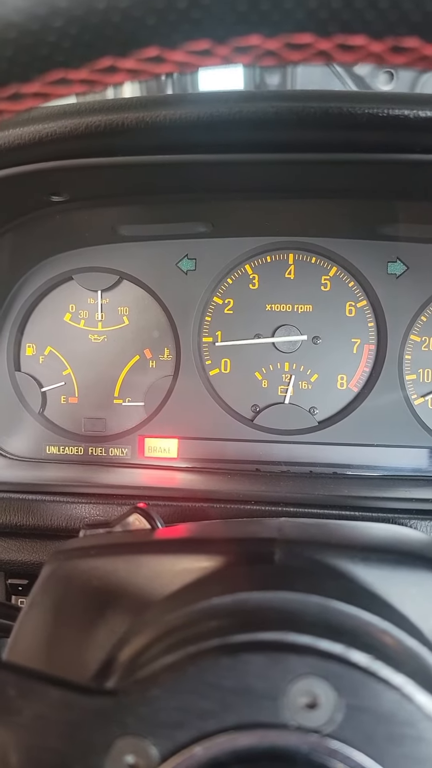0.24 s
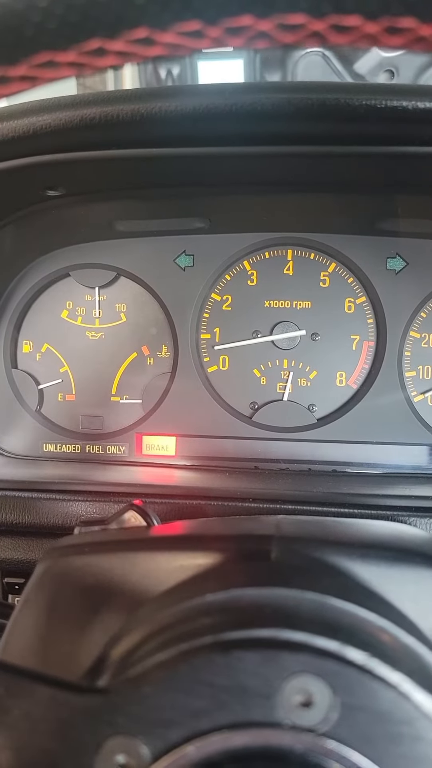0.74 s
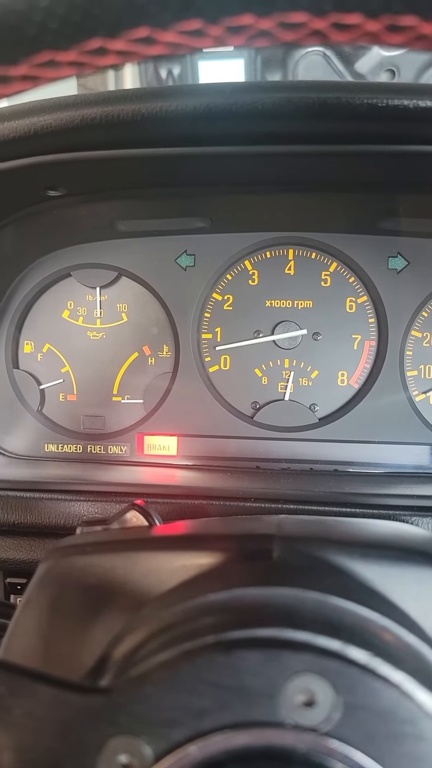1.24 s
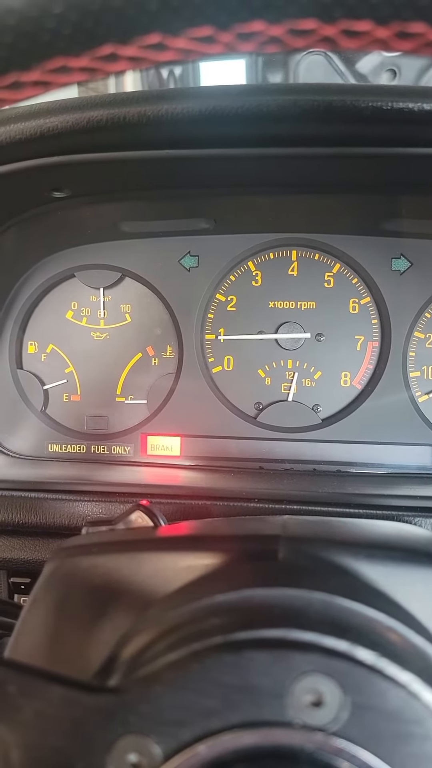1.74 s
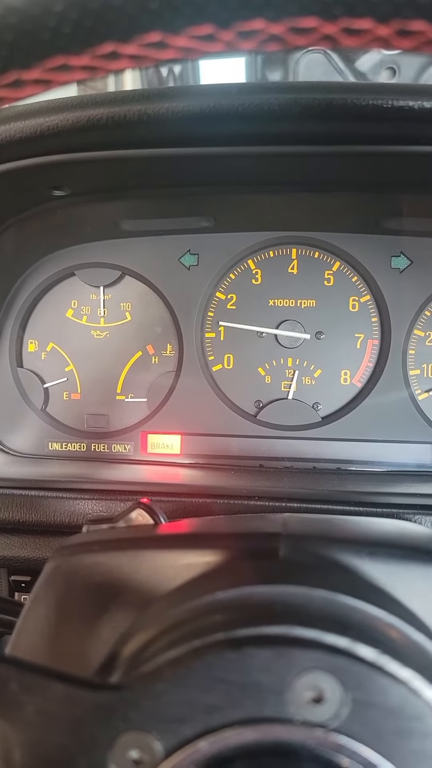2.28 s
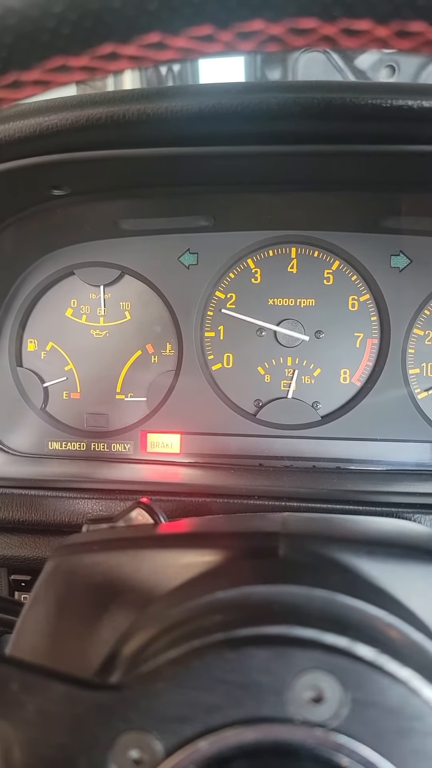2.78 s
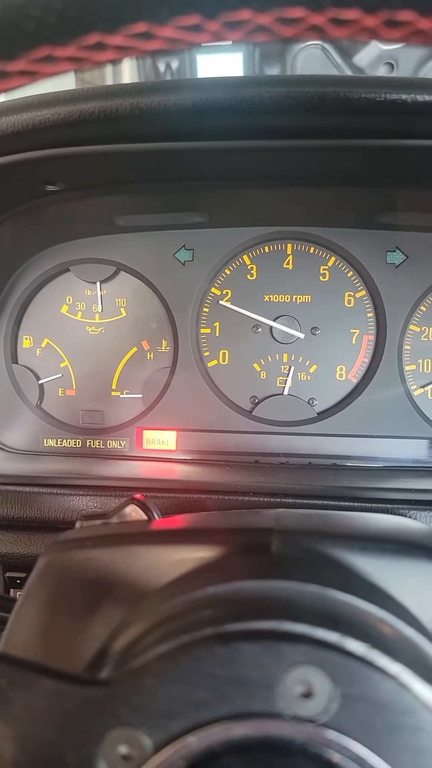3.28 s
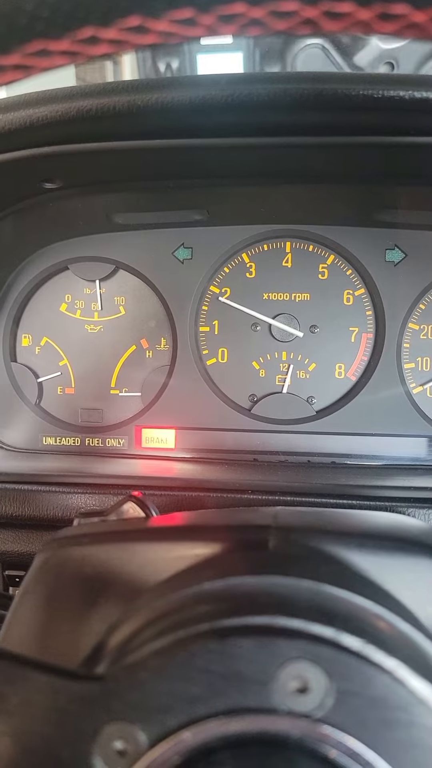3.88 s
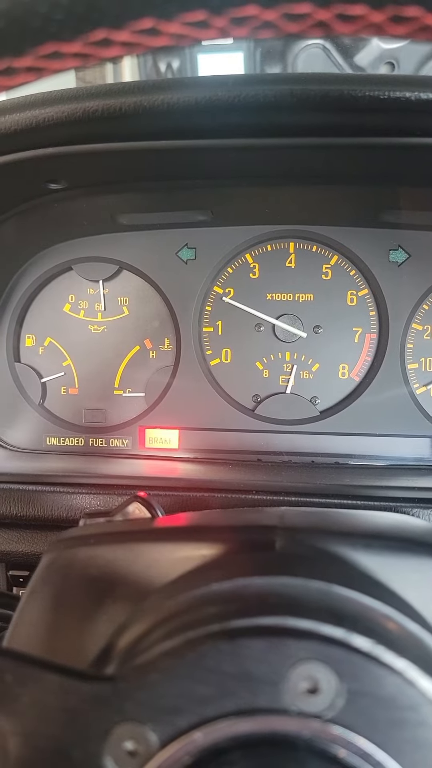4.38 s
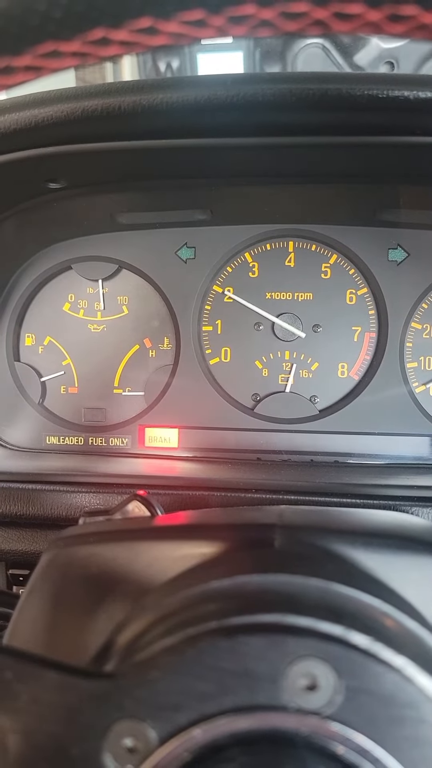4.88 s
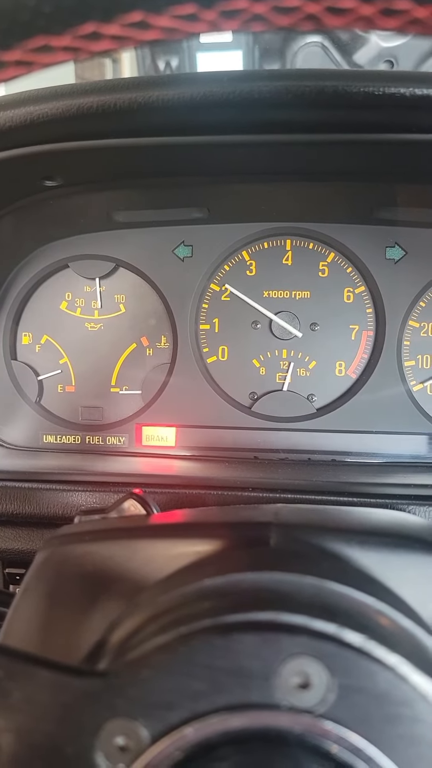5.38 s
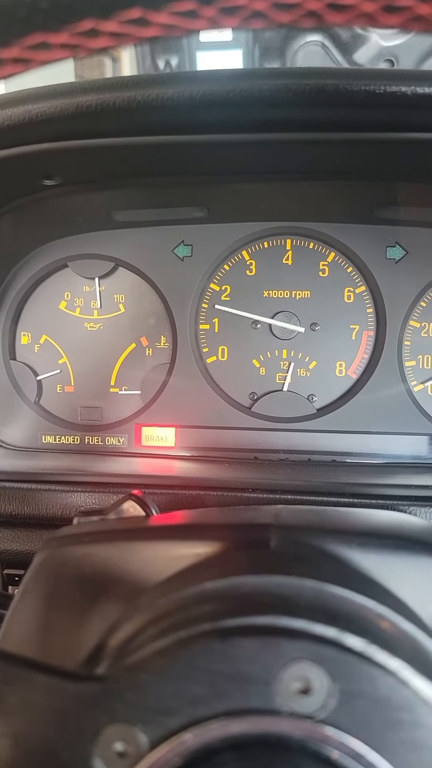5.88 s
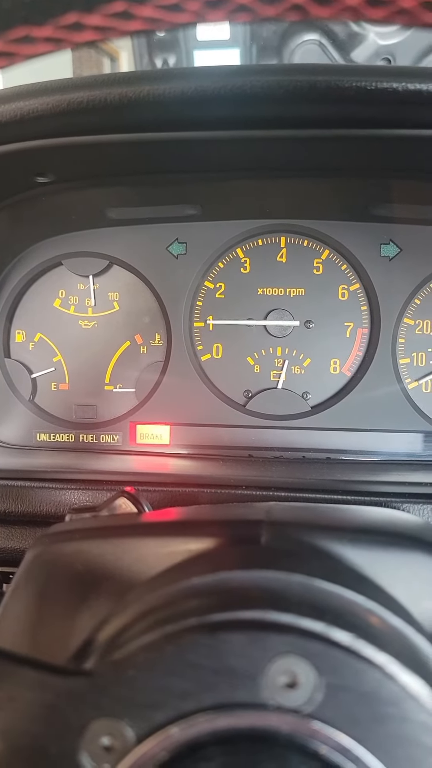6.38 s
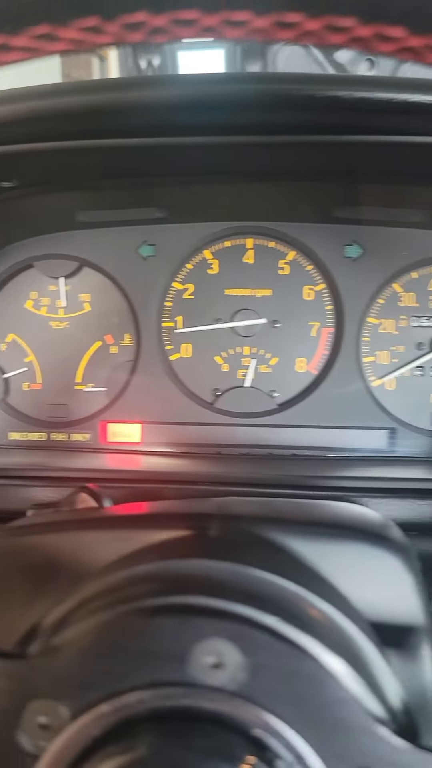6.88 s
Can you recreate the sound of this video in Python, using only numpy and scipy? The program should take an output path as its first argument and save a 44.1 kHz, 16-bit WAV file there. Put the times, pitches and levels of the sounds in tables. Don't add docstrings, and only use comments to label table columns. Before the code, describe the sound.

Inside a car, a rotary engine sags to a lumpy idle, revs up and holds, climbs briefly higher, then falls back to idle.

```python
import sys
import numpy as np
from scipy import signal
from scipy.fft import rfft, irfft, next_fast_len
from scipy.io import wavfile
from scipy.ndimage import uniform_filter1d

SR = 44100
rng = np.random.default_rng(int(sys.argv[2]) if len(sys.argv) > 2 else 0)


def gain_from_db(level_db):
    decades = np.asarray(level_db, float) / 20
    return 10 ** decades


def unload_audio(sound):
    columns = np.transpose(np.atleast_2d(sound))
    steps = np.round(np.clip(columns, -1, 1) * 32767)
    wavfile.write(sys.argv[1], SR, steps.astype(np.int16))


N = 314433
TIME = np.arange(N) / SR

# start_s, opening (0-1)
THROTTLE = [
    (0, 0.54),
    (.4, 0.17),
    (1.4, 0.13),
    (1.9, 0),
    (2.7, 1),
    (5.31, 0.96),
    (5.45, 0.55),
    (6.2, 0.04),
    (7.13, 0.03),
]


def curves(table):
    s, *columns = np.transpose(table)
    return [np.interp(TIME, s, column) for column in columns]


def unit(x):
    return x / np.sqrt(np.mean(x ** 2))


def ring(x, hz, width):
    return signal.lfilter(*signal.iirpeak(hz, hz / width, fs=SR), x)


def loudness(x, span_s=0.46):
    k = int(span_s * SR)
    power = uniform_filter1d(uniform_filter1d(x ** 2, k), k)
    return np.sqrt(power + 1e-12)


def steady(x):
    return x / loudness(x)


def walk(rate_hz):
    k = int(SR / rate_hz)
    held = np.repeat(rng.standard_normal(N // k + 1), k)
    return 1.21 * uniform_filter1d(uniform_filter1d(held, k), k)[:N]


def air(spectrum, likeness):
    hz, db = np.transpose(spectrum)
    n = next_fast_len(N)
    bin_hz = np.arange(n // 2 + 1) * SR / n
    gain = gain_from_db(np.interp(np.log(bin_hz + 1), np.log(hz), db, left=-90, right=-90))
    mid, side = irfft(rfft(rng.standard_normal((2, n))) * gain, n)[:, :N]
    likeness = np.clip(likeness, -1, 1)
    return unit(np.sqrt(1 + likeness) * mid + np.sqrt(1 - likeness) * side * np.array([[1], [-1]]))


def firings(turns, hz):
    throttle, = curves(THROTTLE)

    strain_hz, coast_hz_per_s = 63, 12
    slowing = -np.gradient(uniform_filter1d(hz, SR // 5)) * SR
    coasting = np.clip(slowing / coast_hz_per_s, 0, 1)
    rough = np.maximum(coasting, np.clip((hz - strain_hz) / 10, 0, .4))

    start_s, end_s, ramp_s, overrun_gap_db = 5.4, 6.12, .22, 18
    overrun = np.clip(np.minimum(TIME - start_s, end_s - TIME) / ramp_s + .5, 0, 1)

    rotor_db = 1 + (2.7 - 1) * throttle + overrun_gap_db * overrun
    scatter_db = 1.1 + (1.2 - 1.1) * throttle + 1.1 * rough
    rumble_db = -16 + (-9.5 + 16) * throttle + 3 * rough * (4 - throttle)

    count = np.floor(turns + .003 * scatter_db * walk(30)).astype(int)
    at = np.flatnonzero(np.diff(np.maximum.accumulate(count)) > 0)
    chance = rng.standard_normal(N // 100)[:len(at)]
    rotor = count[at + 1] % 2 - 0.5
    pulses = np.zeros(N)
    pulses[at] = gain_from_db(rotor_db[at] * rotor + scatter_db[at] * chance)
    return steady(pulses), gain_from_db(rumble_db)


def ring_modes(pulses, rumble, modes, db, sharp_db, lag):
    throttle, = curves(THROTTLE)
    rings = []
    for hz, width, mode_db, _, shut_db in modes:
        gas = np.roll(pulses, rng.integers(0, 1800)) + rumble * rng.standard_normal(N)
        drive_db = db + mode_db + sharp_db * np.log2(hz / 100) + shut_db * (1 - throttle)
        gas = np.pad(gain_from_db(drive_db) * gas, (SR // 4, 0), "reflect")
        rings.append(ring(ring(gas, hz, 1.5 * width), hz, 1.5 * width)[-N:])
    lean_db = np.transpose(modes)[3] / 2
    return np.array([gain_from_db(lean_db) @ rings, np.roll(gain_from_db(-lean_db) @ rings, lag)])


def exhaust(pulses, rumble, pressure_db, sharp_db):
    # pitch_hz, width_hz, level_db, left_minus_right_db, shut_throttle_db
    boom_modes = [(28.6, 5.7, -2, -.8, -10), (34.5, 3.45, 2.1, -5.5, 4), (44.7, 8.5, -9.5, -4.5, 6.5),
                  (69.46, 11.8, 1.94, -1.7, -3), (89.1, 10.8, -2, 0.5, 2.5)]
    pipe_modes = [(117.4, 12.3, -13.5, 1, 7.5), (144.8, 13.3, 5, -0.4, 0.5), (166, 6.6, -12, 4, -5),
                  (185.2, 10.4, -2.5, -1.5, -1), (207.5, 14.1, 3.5, 0, -3.5), (235, 19, -5, -4, -11),
                  (244.2, 17, -11, 7, -0.5)]
    panel_modes = [(278, 12.7, -5, 3.3, 1), (305.7, 20.5, 4.5, -3.5, -18.5), (322.7, 8.6, -5, -6.8, 0.2),
                   (350.3, 14.5, -10.5, -11, -10), (380, 13, -18.5, 13, -5), (388, 32, -18.5, 16, -13.5),
                   (478, 36, -20, 10, -6.5)]
    port_lag = 14
    out = ring_modes(pulses, gain_from_db(1) * rumble, boom_modes, 18.5 + pressure_db, sharp_db, port_lag)
    out += ring_modes(pulses, gain_from_db(1) * rumble, pipe_modes, 11.5 + pressure_db, sharp_db, port_lag // 2)
    out += ring_modes(pulses, gain_from_db(-1) * rumble, panel_modes, 13 + pressure_db, sharp_db, port_lag)
    return -gain_from_db(-12.5) * out


def roar(turns, hz):
    # pitch_hz, level_db (per Hz)
    roar_spectrum = [(210, -76), (350, -1), (434, -3), (512, 0), (612, -7.5), (767, -4.5), (1150, -7),
                     (1580, -11), (1960, -14.5), (2130, -14.5), (6000, -30.5), (7800, -65), (13200, -120)]
    gear_order, cruise_hz, db_per_octave = 8.5, 59.7, 16.5
    throb = gain_from_db(0.19 * np.cos(2 * np.pi * turns) + 0.55 * walk(9))
    housing = np.exp(-((gear_order * hz - 520) / 35) ** 2)
    gear = np.sin(2 * np.pi * gear_order * turns + .5 * walk(12))
    gear = gear * housing * gain_from_db(-9.5 + 3.5 * walk(4))
    db = -26 + db_per_octave * np.log2(hz / cruise_hz)
    return gain_from_db(db) * (throb * air(roar_spectrum, -0.036) + gear) * gain_from_db([[-1.5], [1.5]])


def intake(turns, hz, db):
    # pitch_hz, level_db (per Hz)
    hiss_spectrum = [(1760, -3.5), (3000, -7), (4570, -13.5), (4970, -8), (7350, -6), (9940, -12),
                     (10900, -11.5), (12700, -4), (13700, -7), (15100, -6), (16000, -10)]
    depth = np.clip(25 / hz, 0, 1) ** 2
    gulp_db = depth * (3.8 * np.cos(2 * np.pi * turns) + 1.8 * walk(18))
    hiss = air(hiss_spectrum, -.03)
    top = signal.sosfiltfilt(signal.butter(2, 10500, "high", fs=SR, output="sos"), hiss)
    body = (hiss - top) * gain_from_db([[-.8], [.8]])
    flow = gain_from_db(db + gulp_db + 1.0 * walk(6.5))
    return flow * (body + top * gain_from_db(0.16 * gulp_db + 1.0 * walk(16)))


def bay():
    # pitch_hz, level_db (per Hz)
    bed_spectrum = [(240, 0), (400, 3.5), (645, -13), (753, -35), (979, -11), (1820, -9.5), (1990, -2.5),
                    (2120, -14), (4510, -22.5), (6950, -33), (9920, -61), (14800, -57), (16000, -43)]
    # pitch_hz, width_hz, level_db
    housings = [(757, 110, -41), (1396, 32, -49), (2750, 100, -54), (3310, 20, -66), (4790, 17, -58),
                (5710, 78, -59), (6370, 46, -60), (6940, 23, -58.5), (7600, 20, -60), (8540, 40, -58),
                (12255, 20, -89), (12630, 40, -80), (15140, 20, -80)]
    out = gain_from_db(-39.5 + 0.17 * walk(1.3)) * air(bed_spectrum, -0.53)
    for hz, width, db in housings:
        flutter_db = (3.5 * walk(24) - 4) * (hz > 3000)
        out = out + gain_from_db(db + flutter_db) * unit(ring(rng.standard_normal((2, N)), hz, width))
    return out * gain_from_db([[-1.2], [1.2]])


def pump():
    # start_s, pitch_hz, level_db
    whine = [(0, 2010, -47), (.25, 1966, -41.5), (1.4, 1967, -41), (1.75, 1970, -43), (2.8, 1963, -48),
             (3.1, 1920, -39.5), (3.55, 1994, -44), (4.4, 2005, -44.5), (4.75, 1920, -45), (5.5, 1940, -48),
             (5.85, 1960, -43.5), (7.13, 1979, -42)]
    hz, db = curves(whine)
    phase = 2 * np.pi * np.cumsum(hz + 3 * walk(25)) / SR
    fifth = gain_from_db(-18.5)
    mid = np.sin(phase) + fifth * np.sin(1.5 * phase)
    side = gain_from_db(0.5) * (np.cos(phase) + fifth * np.cos(1.5 * phase))
    return np.sqrt(2) * gain_from_db(db + 0.22 * walk(12)) * (mid + side * np.array([[1], [-1]]))


def trim():
    # start_s (centre), length_s, pitch_hz, level_db
    buzzes = [
        (1.583, 0.033, 1380, -31.5),
        (1.634, 0.0077, 1370, -39),
        (1.684, 0.044, 1390, -36),
        (1.79, 0.018, 1400, -36),
        (1.873, 0.015, 1340, -37),
    ]
    rattle = rng.standard_normal((2, N))
    out = np.zeros((2, N))
    for s, length, hz, db in buzzes:
        swell = np.exp(-((TIME - s) / length) ** 2)
        out += gain_from_db(db) * swell * unit(ring(ring(rattle, hz, 350), hz, 350))
    return out


def scene():
    # start_s, firing_rate_hz, exhaust_pressure_db, pulse_sharpness_db (per octave), intake_air_db
    revs = [(0, 32.51, -5.5, 3, -57), (.4, 24.35, -3.5, 0.7, -55), (.8, 22.69, -2, -0.5, -51.5),
            (1.28, 22.38, -0.5, -0.3, -48), (1.55, 31.58, 7.5, -3, -34), (1.76, 36.95, 4.5, 0, -37),
            (2.0, 40.34, 5.5, -3, -39.5), (2.3, 48.31, 4, 2.4, -39.5), (2.7, 57.52, 2.5, -1, -41.5),
            (3.0, 59.82, 2, 1.85, -39.5), (3.65, 61.01, 2.5, 1.34, -40), (4.59, 62.6, 4.5, 0.7, -40.5),
            (4.75, 67.07, 1, 0, -37.5), (5.26, 77.3, 3, 2, -37), (5.56, 61.87, -1, 0.5, -40.5),
            (5.73, 50.73, 2.5, 0.7, -43.5), (6.3, 33.9, -4, 1.7, -55.5), (7.13, 23.83, -3, 0, -55.5)]
    hz, pressure_db, sharp_db, air_db = curves(revs)
    turns = np.cumsum(hz) / SR
    pulses, rumble = firings(turns, hz)
    engine = exhaust(pulses, rumble, pressure_db, sharp_db)
    engine = engine + roar(turns, hz) + intake(turns, hz, air_db)
    return engine + bay() + pump() + trim()


def band_limit(x):
    return signal.sosfilt(signal.butter(12, 16230, fs=SR, output="sos"), x)


def record(dry):
    x = signal.sosfilt(signal.butter(2, 22, "high", fs=SR, output="sos"), dry)
    x = signal.sosfilt(signal.ellip(10, .3, 70, 15750, fs=SR, output="sos"), x)
    rounded = .97 * np.tanh(x / .97)
    mix = .3 * rounded + .7 * np.clip(x, -.95, .95)
    return band_limit(mix)


dry = scene()
out = record(dry)
unload_audio(out)
```